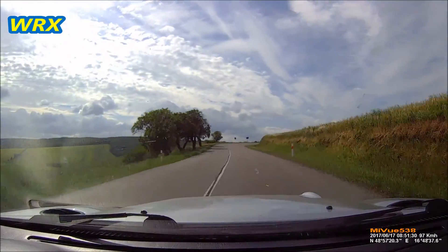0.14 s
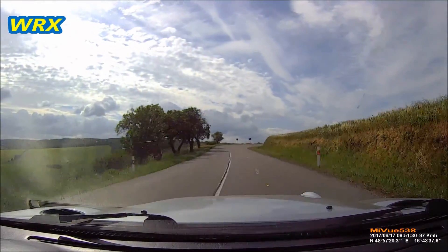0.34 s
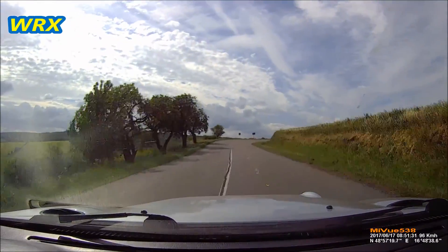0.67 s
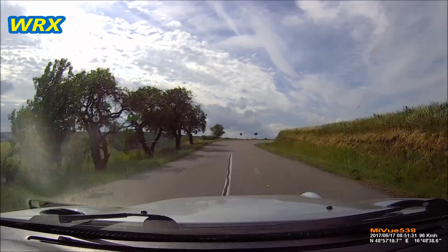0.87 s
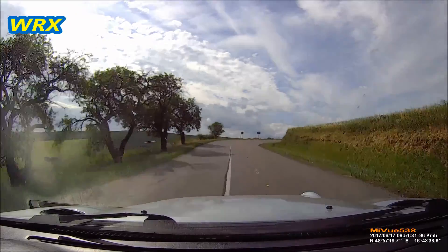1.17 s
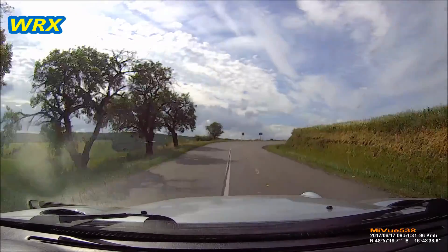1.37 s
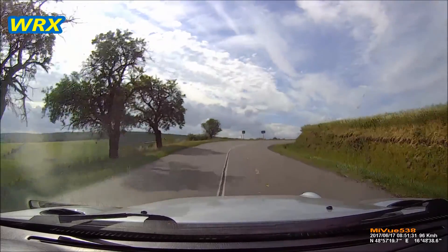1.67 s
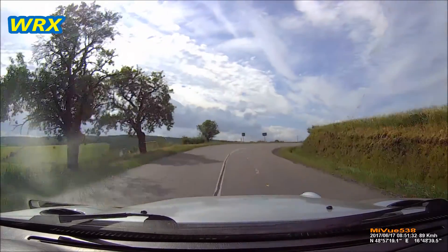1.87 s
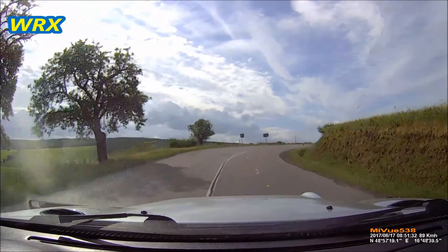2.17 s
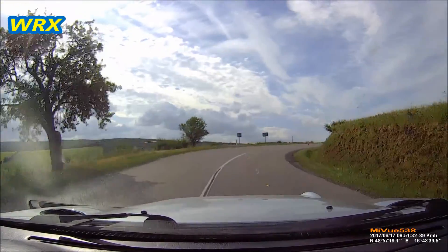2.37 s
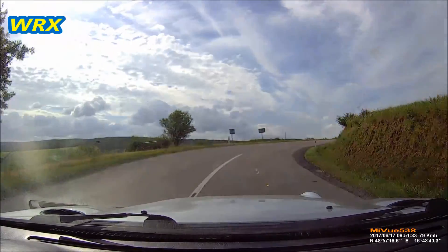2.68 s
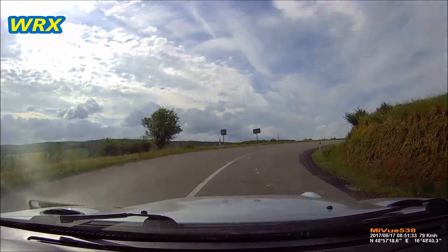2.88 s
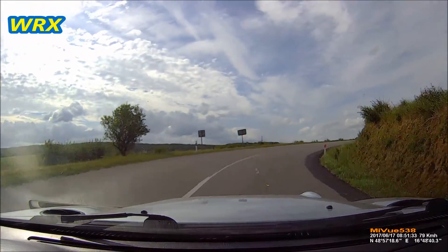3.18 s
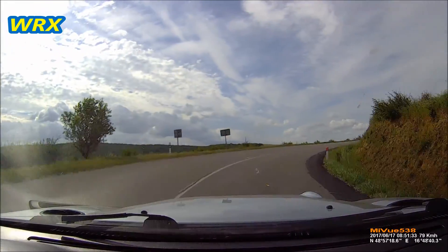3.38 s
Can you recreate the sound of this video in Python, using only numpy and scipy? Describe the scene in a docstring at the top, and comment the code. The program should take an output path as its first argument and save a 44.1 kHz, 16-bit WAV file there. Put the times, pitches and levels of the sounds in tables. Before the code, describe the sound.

A car engine drones from inside, sinking and picking up again as tyres rumble.

```python
"""Inside a car on a country road, microphone at the windscreen. The engine booms through the cabin
over tyres rumbling in its resonances and a faint gear whine; an intake hiss fades as the throttle closes.
The car slows for a bend: the engine note sinks and loose plastic trim ticks and rattles close by.
One thin digital click sounds midway. Body panels thud over bumps, and the engine picks up again."""
import sys
import numpy as np
from scipy.fft import rfft, irfft, next_fast_len
from scipy.io import wavfile
from scipy.ndimage import map_coordinates

SR = 44100
rng = np.random.default_rng(int(sys.argv[2]) if len(sys.argv) > 2 else 0)


def put_to_file(sound):
    """Save the sound as 16-bit audio at rate SR, in the file named by the first command-line argument."""
    columns = np.atleast_2d(sound).T  # one column per channel
    safe = np.clip(columns, -1, 1)
    whole_steps = np.round(safe * 32767)
    wavfile.write(sys.argv[1], SR, whole_steps.astype(np.int16))


N = 156114
TIME_S = np.arange(N) / SR


def amp(db):
    """Decibels to gain."""
    return 10 ** (np.asarray(db) / 20)


def unit(x):
    """Scale to rms 1."""
    return x / np.sqrt(np.mean(x ** 2) + 1e-20)


def curves(rows):
    """One value per sample for each column after the time."""
    times, *columns = np.transpose(rows)
    return [np.interp(TIME_S, times, column) for column in columns]


def wobble(rate):
    """A smooth random curve, rate knots a second."""
    knots = rng.standard_normal(int(N * rate / SR) + 4)
    return map_coordinates(knots, [TIME_S * rate])


def gain_at(colour, hz):
    """Gain of a (frequency_hz, level_db) colour, read on a log frequency axis."""
    points_hz, db = np.transpose(colour)
    return amp(np.interp(np.log(hz + 1), np.log(points_hz + 1), db))


def filtered(x, response):
    """Shape x by a gain against frequency."""
    size = next_fast_len(len(x) + 8192)
    return irfft(rfft(x, size) * response(np.fft.rfftfreq(size, 1 / SR)), size)[:len(x)]


def noise(colour):
    """Noise of rms 1 with a (frequency_hz, level_db) colour."""
    return unit(filtered(rng.standard_normal(N), lambda hz: gain_at(colour, hz)))


def ringing(modes):
    """Noise of rms 1 through resonances of alternating polarity."""
    def response(hz):
        return sum((-1) ** k * amp(db) * 1j * hz * width / (centre ** 2 - hz ** 2 + 1j * hz * width)
                   for k, (centre, width, db) in enumerate(modes))
    return unit(filtered(rng.standard_normal(N), response))


def burst(response, t60_s, attack_s=0.00059):
    """Filtered noise that starts sharply and dies away."""
    t = np.arange(SR // 8) / SR
    envelope = amp(-60 * t / t60_s) * (1 - np.exp(-t / attack_s))
    return unit(filtered(rng.standard_normal(len(t)), response)) * envelope


def add(out, start_s, sound):
    """Mix a sound in at start_s."""
    out[round(start_s * SR):][:len(sound)] += sound


def microphone_hiss(level_db=-62.5):
    """The microphone's own steady noise, far under the scene."""
    # hiss colour: frequency_hz, relative_db
    colour = [(500, 6.5), (3000, -2.5), (5500, -4.5), (7100, -2.5), (7900, -13), (9000, -12.5),
              (15000, -13.5)]
    return amp(level_db) * noise(colour)


def recorder_click(start_s=1.629, level_db=-45.5):
    """One thin, very high digital click."""
    # click colour: frequency_hz, relative_db
    colour = [(3000, -17), (8000, -1), (15000, 1.5)]
    out = np.zeros(N)
    add(out, start_s, amp(level_db) * burst(lambda hz: gain_at(colour, hz), t60_s=.006))
    return out


def gear_whine():
    """A faint, wavering drivetrain tone that sinks with road speed."""
    # course of the whine: time_s, pitch_hz, level_db
    course = [(0, 372, -49), (1.1, 373.1, -43.5), (2.0, 357.1, -45.5), (2.55, 338, -45),
              (2.95, 318.4, -36.5), (3.13, 302.2, -39), (3.54, 293.3, -51)]
    pitch_hz, level_db = curves(course)
    gain = np.sqrt(2) * amp(level_db + 3.2 * wobble(14))
    phase = 2 * np.pi * np.cumsum(pitch_hz) / SR
    return gain * np.sin(phase + 0.51 * wobble(15))


def tyres(level_db=-28, cabin_db=-42.5, corner_hz=497, fall_db_per_s=2.5):
    """Tyre rumble holds steady while the roar above it and the cabin's ringing fade as the car slows."""
    # tyre noise from inside the car: frequency_hz, relative_db
    colour = [(8, -16.5), (20, -5.5), (40, 3.5), (70, -4.5), (135, 3.5), (200, -10), (250, -7), (295, -1),
              (330, -8.5), (365, -5), (470, -12), (550, -9.5), (670, -14.5), (790, -13.5), (1000, -19),
              (1400, -23), (2050, -28), (2800, -40.5), (4200, -49.5), (8000, -66)]
    # narrow cabin resonances that the tyres excite: centre_hz, width_hz, relative_db
    cabin_modes = [(293.2, 27, -1.5), (549, 25, -4), (788, 35, -7.5), (858, 28, -13), (1071, 22, -11.5)]
    roll = noise(colour)
    low = filtered(roll, lambda hz: 1 / (1 + (hz / corner_hz) ** 4))
    roar_db = 4 - fall_db_per_s * TIME_S + .5 * wobble(11)
    roar = (roll - low) * amp(roar_db)
    cabin = amp(cabin_db + roar_db) * ringing(cabin_modes)
    rumble = low * amp(.4 * wobble(11))
    return amp(level_db) * (rumble + roar) + cabin


def bumps(width_s=0.028):
    """Each bump in the road is a short swell of thudding body panels."""
    # bumps under the wheels: peak_s, level_db
    jolts = [(.22, -29), (2.2, -32), (2.35, -32), (2.66, -28.5), (3.12, -30.5), (3.29, -33)]
    # thud of the panels: frequency_hz, relative_db
    colour = [(40, -37.5), (90, -15), (135, -0.5), (220, -7.5), (295, -0.5), (380, -1), (470, -8.5),
              (600, -18.5), (1500, -41), (4000, -78.5)]
    swells = sum(amp(db) * np.exp(-.5 * ((TIME_S - peak_s) / width_s) ** 2) for peak_s, db in jolts)
    return noise(colour) * swells


def intake(air_db=-3, duct_db=-2, duct_fade_db_per_s=1.7):
    """Air hisses through the ducts and dies as the throttle closes; their ringing fades faster."""
    # fade of air and ducts together: time_s, gain_db
    fade = [(0, -29.5), (.15, -32), (.33, -37), (.53, -42), (.9, -46.5), (1.45, -53.5), (2.1, -54),
            (2.6, -67), (3.54, -67.5)]
    # broad colour of the rushing air: frequency_hz, relative_db
    colour = [(400, -21.5), (1000, -10), (1500, -6), (2150, 0), (2600, -7), (3300, -7), (3700, -10),
              (4300, -12), (5100, -16.5), (6800, -15), (7800, -23), (9000, -32.5), (15000, -35.5)]
    # resonances of the intake ducts: centre_hz, width_hz, relative_db
    duct_modes = [(1610, 22, -8), (1725, 26, -2), (2009, 18, 2), (2066, 28, -1), (2150, 30, -5),
                  (2226, 18, -3), (2279, 16, -2), (2490, 45, -11), (2783, 30, -9), (3078, 28, -8),
                  (3315, 24, -5), (3860, 45, -14), (4197, 22, -9), (5160, 40, -20)]
    gain_db, = curves(fade)
    ducts = amp(duct_db - duct_fade_db_per_s * TIME_S) * ringing(duct_modes)
    air = amp(air_db) * noise(colour)
    return amp(gain_db + 0.38 * wobble(25)) * (air + ducts)


def trim_tick(centre_hz, t60_s, width_oct=.55, snap_db=-13):
    """One plastic contact: a snap, and the trim rings, its colour weighted toward the part's pitch."""
    # ring that all the trim shares: frequency_hz, relative_db
    ring_colour = [(500, -3.5), (1300, -1), (2050, 12.5), (2600, -1), (3400, -5.5), (4600, -1.5),
                   (5600, -3.5), (7200, -1), (8300, -15), (10000, -22.5), (15000, -27.5)]
    # bright snap of the contact: frequency_hz, relative_db
    snap_colour = [(800, -8), (2000, 6), (3000, -0.5), (7000, 0), (9000, -8.5), (15000, -12)]

    def ring_response(hz):
        octaves_off = np.log2((hz + 1) / centre_hz)
        return gain_at(ring_colour, hz) / (1 + (octaves_off / width_oct) ** 2)
    ring = burst(ring_response, t60_s)
    snap = burst(lambda hz: gain_at(snap_colour, hz), t60_s=.018)
    return ring + amp(snap_db) * snap


def trim_rattles(chatter_db=-63.5):
    """Loose trim near the microphone chatters faintly, then ticks on the rough road."""
    # trim contacts: start_s, ring_level_db, centre_hz, t60_s
    ticks = [(1.505, -51, 5000, .06), (1.566, -42.5, 6314, .02), (1.701, -56, 6500, .04),
             (1.772, -55.5, 6000, .08), (2.057, -48, 5500, 0.02), (2.165, -42.5, 6500, .016),
             (2.176, -37, 6100, .018), (2.351, -38.5, 2400, 0.037), (2.372, -44, 7200, 0.025),
             (2.445, -36, 1800, 0.032), (2.644, -42, 3100, .06), (2.657, -42.5, 2900, .05),
             (2.804, -40.5, 4300, .03), (2.976, -45, 2616, .04), (3.101, -31.5, 4300, .042),
             (3.377, -53.5, 7500, .05), (3.388, -59, 7000, .03)]
    out = np.zeros(N + SR)
    chatter = [(rng.uniform(.6, 1.8), rng.normal(chatter_db, 3), 6500, .04) for _ in range(30)]
    for start_s, level_db, centre_hz, t60_s in ticks + chatter:
        add(out, start_s, amp(level_db) * trim_tick(centre_hz, t60_s))
    return out[:N]


def engine(waver_db=0.5):
    """The firing tone and its octave boom in the cabin; weaker orders waver in level above the tone."""
    # slowing and picking up: time_s, firing_hz, firing_level_db, octave_level_db
    revs = [(0.0, 116.8, -18.5, -29.5), (0.14, 107.4, -24.5, -46.5), (0.26, 109.1, -15.5, -34.5),
            (0.5, 108.9, -14.4, -45.5), (0.8, 107.2, -15, -38), (1.05, 104.4, -18, -35),
            (1.35, 101.6, -18.5, -38.0), (1.6, 98.4, -21.5, -39), (1.9, 96.36, -19.5, -36.5),
            (2.24, 92.4, -19.5, -38), (2.36, 85.2, -25.5, -34.5), (2.5, 79.55, -20, -32),
            (2.66, 70.87, -34.5, -30.5), (2.82, 64.93, -30, -21), (2.97, 57.09, -42, -23),
            (3.12, 50.5, -39, -31.5), (3.21, 57.0, -35, -25), (3.31, 64.9, -28, -18.5),
            (3.4, 75.86, -28, -31.5), (3.54, 89.1, -19, -26)]
    # weaker engine orders: multiple_of_firing_rate, level_db
    orders = [(1.25, -47), (1.5, -41), (2.5, -46), (3, -46), (3.5, -48.5), (4, -46.5), (5, -48)]
    firing_hz, firing_db, octave_db = curves(revs)
    phase = 2 * np.pi * np.cumsum(firing_hz) / SR

    def tone(order, db):
        return np.sqrt(2) * amp(db) * np.sin(order * phase + rng.uniform(0, 2 * np.pi))
    boom = tone(1, firing_db) + tone(2, octave_db)
    return boom + sum(tone(order, db + waver_db * wobble(12)) for order, db in orders)


def scene():
    """The cabin as heard at the windscreen, plus the digital click, in mono."""
    return (gear_whine() + tyres() + bumps() + intake() + trim_rattles() + recorder_click()
            + engine())[None]


def record(dry):
    """The microphone adds its own hiss and keeps nothing above its band limit."""
    top_hz = 15800
    return filtered(dry[0] + microphone_hiss(), lambda hz: hz < top_hz)[None]


dry = scene()
out = record(dry)
put_to_file(out)
```